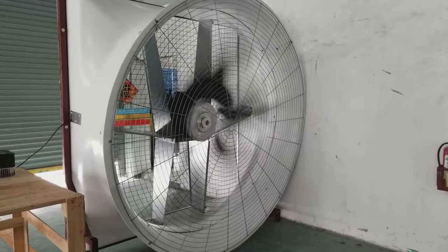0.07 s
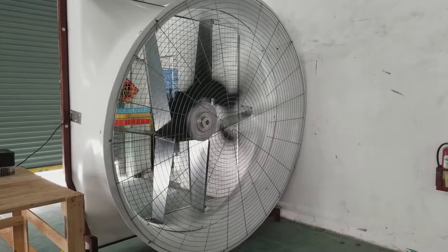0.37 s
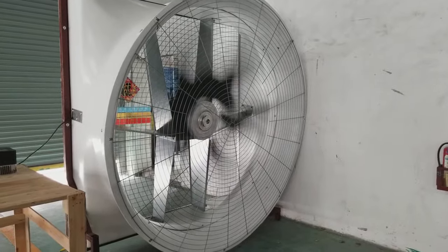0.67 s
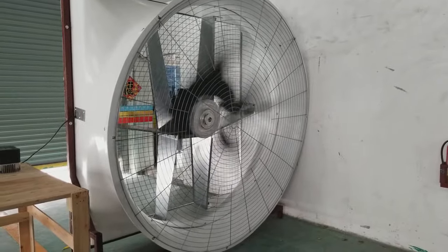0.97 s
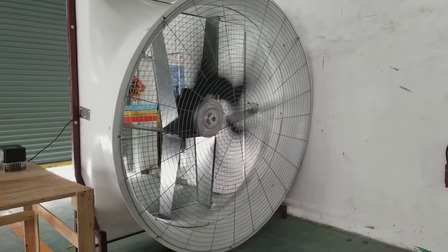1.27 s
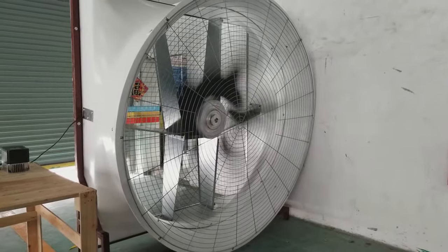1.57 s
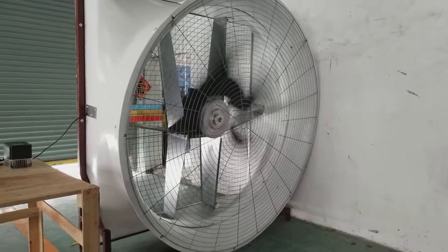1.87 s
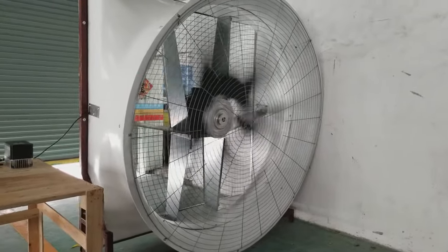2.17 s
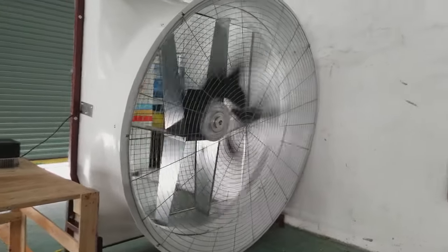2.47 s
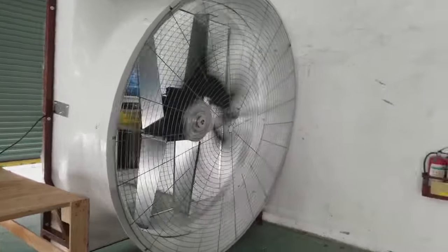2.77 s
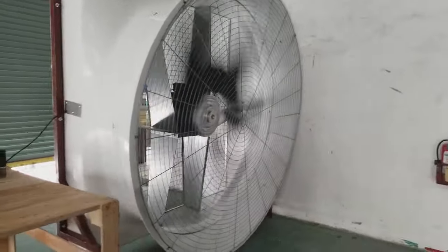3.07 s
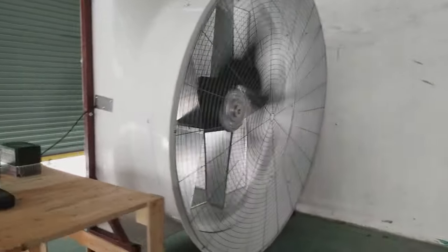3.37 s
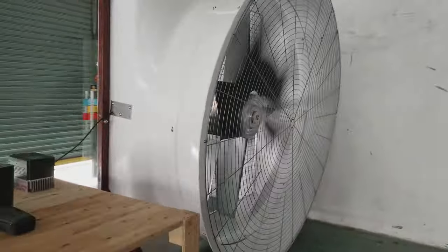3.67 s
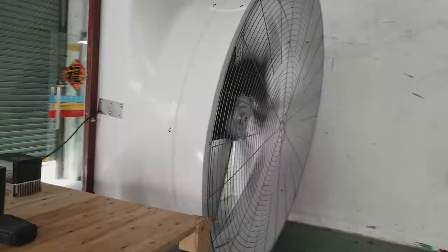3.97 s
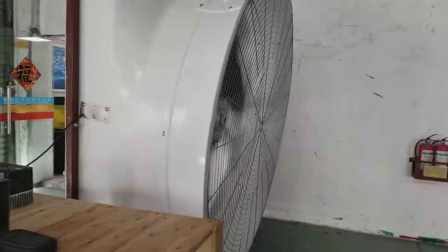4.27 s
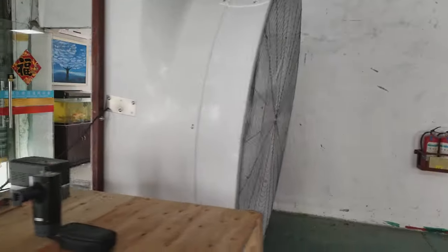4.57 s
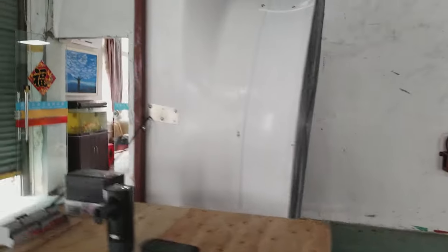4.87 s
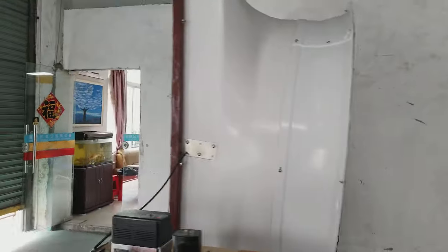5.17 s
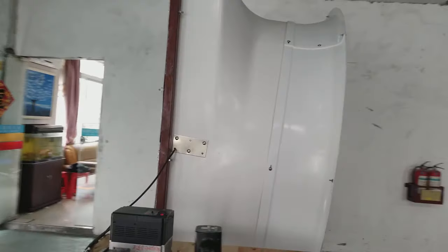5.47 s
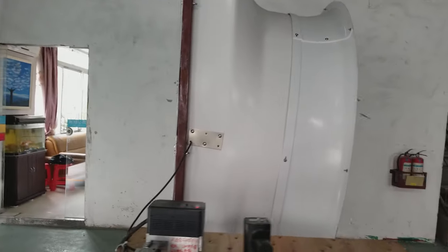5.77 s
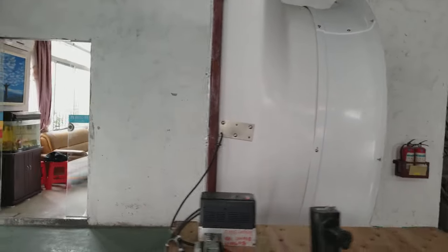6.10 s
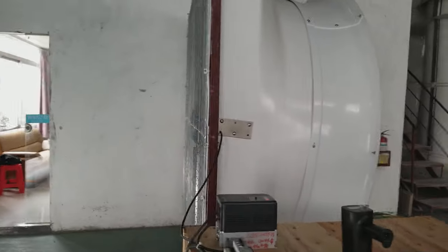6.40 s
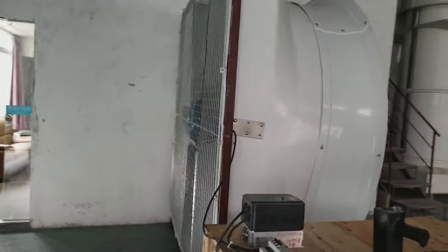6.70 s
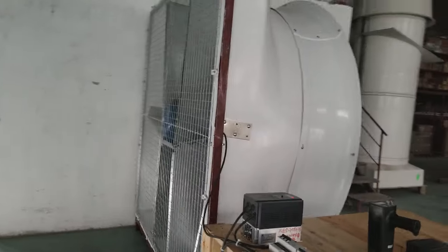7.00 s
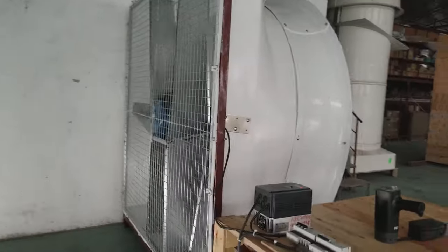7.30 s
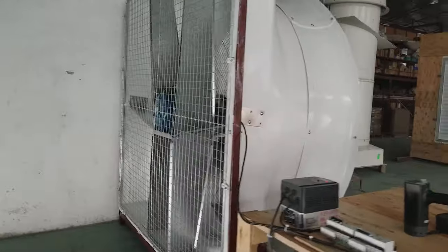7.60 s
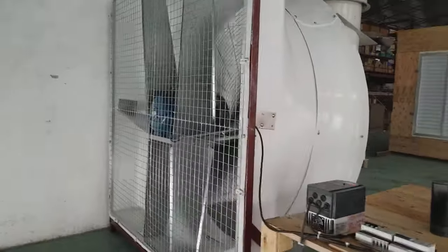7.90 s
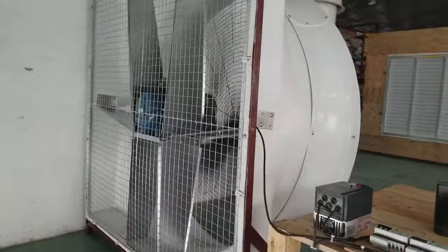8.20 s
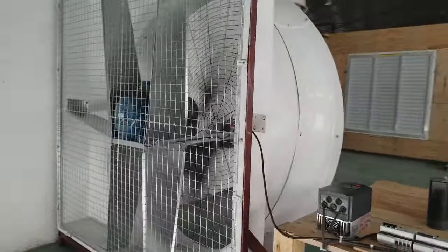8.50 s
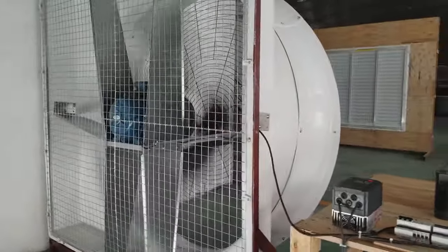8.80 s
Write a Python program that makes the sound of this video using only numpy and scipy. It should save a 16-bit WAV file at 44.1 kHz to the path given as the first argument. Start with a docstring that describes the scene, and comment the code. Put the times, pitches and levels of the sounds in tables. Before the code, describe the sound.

A large exhaust fan drones and rushes air in a hard-walled room, its steady tone swelling and fading as the microphone circles it.

```python
"""A big six-blade exhaust fan in a hard-walled workshop, heard on a phone's two microphones,
15 cm apart, carried round it from the cone past the side to the intake at the back.
The blades throb 41 times a second and chop a rush of air, the drive sings one strong note,
and the motor hums and whines faintly. The tones form standing waves in the room, so they
swell and fade as the phone moves through them. A shoe scuffs once on the way."""
import sys
import numpy as np
from scipy import signal
from scipy.fft import rfft, irfft, next_fast_len
from scipy.io import wavfile
from scipy.ndimage import uniform_filter1d, minimum_filter1d, map_coordinates

SR = 44100
rng = np.random.default_rng(int(sys.argv[2]) if len(sys.argv) > 2 else 0)


def output_pcm(signal):
    """Save a mono or channel-first signal as 16-bit PCM at the path in sys.argv[1].

    Samples are clipped to [-1, 1] before scaling.
    """
    pcm = np.clip(np.atleast_2d(signal).T, -1, 1) * 32767
    wavfile.write(sys.argv[1], SR, np.round(pcm).astype(np.int16))


N = 390285
T = np.arange(N) / SR
FFT_SIZE = 2 * next_fast_len(N // 2 + 1)
FREQS = np.fft.rfftfreq(FFT_SIZE, 1 / SR)
BLADE_HZ, BLADES = 41.33, 6
MIC_SPACING_M, SOUND_M_PER_S = 0.15, 343
SETS_OFF_S, HELD_PACE = 2.02, 0.29  # the phone moves at this share of walking pace until it sets off
EARS = np.array([[1], [-1]])  # left and right

# bearing of the fan, as the left microphone's lead: time_s, lead_ms
MIC_LEAD = [(0, -0.12), (3.5, -0.053), (4.2, -0.0071), (4.8, 0.35), (6.8, 0.48), (8.85, 0.35)]
# boom of the cone along the walk, loudest at the two openings: time_s, level_db
CONE_LEVEL = [(0, -23), (2.4, -23.5), (3.3, -27.5), (4.6, -26), (5.6, -34.5), (6.9, -36), (7.3, -35),
              (7.8, -25.5), (8.5, -24), (8.85, -23.5)]


def undb(db):
    """Decibels to gain."""
    return np.exp(np.log(10) * np.asarray(db) / 20)


def curves(table):
    """The columns of a table, joined by straight lines in time."""
    times, *columns = np.transpose(table)
    return [np.interp(T, times, column) for column in columns]


def unit(x):
    """Scale to rms 1."""
    return x / np.sqrt(np.mean(x ** 2))


def bump(at_s, half_s):
    """A bell curve in time, of height 1."""
    return np.exp(-((T - at_s) / half_s) ** 2)


def wander(rate_hz):
    """A smooth random curve with a spread near 1 that changes about rate_hz times a second."""
    knots, coarse = rng.standard_normal(1024), T[::128]
    return np.interp(T, coarse, map_coordinates(knots, [coarse * rate_hz], order=3, mode="nearest"))


def tone(turns):
    """A sine of rms 1 with a random starting phase."""
    return np.sqrt(2) * np.sin(2 * np.pi * (turns + rng.random()))


def coherence(hz):
    """Diffuse sound is alike at the two microphones only for long waves."""
    return np.sinc(2 * hz * MIC_SPACING_M / SOUND_M_PER_S)


def housing_shade_db():
    """The housing shades sound leaving the openings: 0 in front of the cone, lowest at the side."""
    cone_db, = curves(CONE_LEVEL)
    return cone_db - cone_db.max()


def turbulence(spectrum, direct):
    """Air noise: the direct share of its power reaches one microphone first, the rest is diffuse."""
    hz, db = np.transpose(spectrum)
    band_hz = FREQS[FREQS < 1.1 * hz[-1]]
    colour = undb(np.interp(np.log(band_hz + 1), np.log(hz), db))
    alike = coherence(band_hz)
    shares = np.sqrt([(1 + alike) / 2, (1 - alike) / 2, np.ones_like(alike)])
    white = rng.standard_normal(shares.shape) + 1j * rng.standard_normal(shares.shape)
    mid, side, straight = irfft(white * colour * shares, FFT_SIZE)[:, :N]
    lead_s = curves(MIC_LEAD)[0] / 1000
    straight_pair = np.array([straight, np.interp(T - lead_s, T, straight)])
    return unit(np.sqrt(direct) * straight_pair + np.sqrt(1 - direct) * (mid + side * EARS))


def room_tone(hz, clock, echo, fade_rate):
    """A tone plus wall echoes that drift as the phone moves; high tones fade apart left and right."""
    phase = 2 * np.pi * (hz * clock + rng.random())
    walked_s = np.cumsum(np.where(T < SETS_OFF_S, HELD_PACE, 1)) / SR
    fades = [np.interp(walked_s, T, wander(fade_rate)) for _ in range(4)]
    cosine, sine, alike = np.cos(phase), np.sin(phase), coherence(hz)
    mid = np.sqrt(1 + alike) * (fades[0] * cosine + fades[1] * sine)
    side = np.sqrt(1 - alike) * (fades[2] * cosine + fades[3] * sine)
    return unit(cosine + echo / 2 * (mid + side * EARS))


def air_rush(clock):
    """The cone booms; wakes roar, tips swish, struts hiss and wires sizzle, pulsing with each blade."""
    # spectra of blade wakes, blade tips, struts, guard wires and hollow cone: freq_hz, density_db
    wakes = [(20, -34.5), (35, -29.5), (62, -18), (85, -5.5), (115, -4), (170, -0.5), (235, 1), (340, 1),
             (440, -2.5), (520, -6.5), (750, -50)]
    tips = [(380, -36.5), (520, -0.5), (620, 0), (730, -1), (850, -4.5), (1000, -7.5), (1250, -9),
            (1550, -14.5), (2300, -49)]
    struts = [(1050, -20.5), (1550, -1), (1950, 1), (2600, -0.35), (3100, -4.5), (3700, -11.5),
              (4200, -14.5), (5000, -22), (6500, -35.5), (8000, -52)]
    wires = [(3500, -18), (5500, 2.5), (6800, -0.5), (8400, 0), (9000, -2), (9500, -3), (11000, -2.5),
             (12400, -1.2), (14000, -6), (15600, -7.5)]
    cone = [(120, -20.5), (175, -1), (220, -0.5), (255, 0), (300, -4.5), (380, -38.5)]
    # relative levels along the walk, weakest beside the housing: time_s, swish_db, hiss_db, sizzle_db
    rush_levels = [(0.0, -25, -30.5, -53), (3.2, -25.5, -31, -53.0), (3.95, -28, -31.0, -54.0),
                   (6.2, -29, -33.5, -54.5), (7.95, -24.5, -28.5, -49.5), (8.85, -25.5, -29, -50)]
    # how hard the blades chop the air, least from the side: time_s, relative_depth
    chop = [(0, 0.37), (1.6, 0.47), (3.2, 0.2), (6.8, 0), (8.85, 0.1)]
    swish_db, hiss_db, sizzle_db = curves(rush_levels)
    blade_phase = 2 * np.pi * BLADE_HZ * clock
    gust = curves(chop)[0] * np.cos(blade_phase)
    roar = turbulence(wakes, direct=0.22) * undb(-17.5 + 0.041 * housing_shade_db() + 0.9 * wander(6))
    swish = turbulence(tips, direct=0.21) * undb(swish_db + 5.5 + 0.16 * wander(13))
    hiss = turbulence(struts, direct=0.21) * undb(hiss_db + 3.3 + 0.29 * wander(14))
    sizzle = turbulence(wires, direct=0.02) * undb(sizzle_db + 5.5 + 0.25 * wander(20))
    boom = turbulence(cone, direct=0.26) * undb(curves(CONE_LEVEL)[0] + 2.55 * wander(8))
    # the guards are struck twice, by the front and the back edge of a blade
    edges = 1 + 0.19 * gust + 0.028 * np.cos(2 * blade_phase)
    return boom + roar * (1 + 0.15 * gust) + swish * (1 + 0.51 * gust) + (hiss + sizzle) * edges


def standing_wave(multiple):
    """Gain of one deep blade harmonic as the phone crosses its nodes and crests in the room."""
    # nodes (negative) and crests (positive): centre_s, blade_rate_multiple, half_length_s, gain_db
    crossings = [(.15, 3, .3, -12), (1.6, 4, 0.55, -3.5), (2.1, 3, .6, 3), (2.7, 2, 0.39, -13),
                 (2.9, 4, .4, 5), (3.95, 4, .22, -17), (4.0, 3, .3, -12), (4.5, 2, .5, 4),
                 (5.85, 2, 0.35, -11), (6.35, 4, .25, -7), (8.6, 4, .3, 4)]
    return undb(sum(db * bump(at_s, half_s) for at_s, k, half_s, db in crossings if k == multiple))


def blade_throb(clock):
    """The blades' pressure pulse: a deep throb and its harmonics, each wavering a little."""
    # the throb, strong in front of the cone, cancelled in the plane of the blades: time_s, level_db
    throb_level = [(0.0, -26.5), (2.4, -27.5), (5.45, -32), (6.7, -44.5), (7.1, -55), (7.8, -37.5),
                   (8.85, -35.0)]
    # deep harmonics and weaker high ones: blade_rate_multiple, relative_db
    deep_harmonics = [(2, -28.5), (3, -28), (4, -25.5)]
    overtones = [(5, -27), (6, -28), (9, -43), (12, -43), (16, -44)]
    # lift of the deep harmonics behind the fan, at the open intake: time_s, gain_db
    intake_lift = [(6.8, 0.5), (8.2, 3)]
    lead_s = curves(MIC_LEAD)[0] / 1000
    # only part of the deep sound travels across the phone; the rest stands in the room
    passes = BLADE_HZ * (clock + 0.73 * EARS * lead_s / 2)
    harmonic = lambda k: tone(k * (passes + 0.0054 * wander(7.7)))
    throb = undb(curves(throb_level)[0]) * harmonic(1)
    shade_db, intake_db = housing_shade_db(), curves(intake_lift)[0]
    for k, db in deep_harmonics:
        level_db = db + 0.08 * k * shade_db + intake_db + 0.8 * wander(2.22)  # short waves shaded more
        throb += undb(level_db) * standing_wave(k) * harmonic(k)
    upper = sum(undb(db) * room_tone(k * BLADE_HZ, clock, echo=0.56, fade_rate=2.57)
                for k, db in overtones)
    return throb + upper * undb(1.1 + 0.34 * shade_db)


def drive_note(clock, pitch_hz=578.9):
    """One strong note that flutters with each turn of the shaft and is roughened by the blades."""
    # the note along the walk: time_s, relative_db, left_minus_right_db
    note_levels = [(0.0, -18.5, -10), (1.95, -20.5, -5.5), (2.3, -22.5, 11.5), (2.65, -19, 0),
                   (2.8, -15.0, 8), (3.4, -13.0, 4.5), (3.75, -18.5, -8.0), (3.95, -16, 5), (4.3, -16, -3),
                   (4.5, -17.5, 6), (5.0, -16, -2), (5.25, -21.5, 2), (5.6, -14.5, 0), (6.85, -14.0, 2),
                   (7.05, -21.5, -0.5), (7.2, -18, 13), (7.7, -23, -9.0), (7.95, -20, -1), (8.3, -13, 4),
                   (8.85, -17, -5)]
    # relative levels of its sidebands, one blade rate either side: time_s, lower_db, upper_db
    sideband_levels = [(0.0, -33.0, -28), (2.7, -33.0, -28), (3.0, -35, -42), (3.85, -42, -29),
                       (4.95, -35, -41), (6.05, -37.0, -32), (7.65, -25.5, -37), (8.85, -34, -23.5)]
    db, pan_db = curves(note_levels)
    # near a node of the standing wave the microphones hear it out of step, and the flutter stands out
    node = np.clip((-12 - db) / 7, 0, 1.1)
    shaft_phase = 2 * np.pi * BLADE_HZ / BLADES * clock
    flutter_db = (0.21 + 0.44 * node) * np.sin(shaft_phase + EARS) + 0.13 * wander(14)
    balance = undb(EARS * pan_db / 2)
    balance /= np.sqrt(np.mean(balance ** 2, axis=0))
    note = undb(db + 0.03 - 0.4 * node + flutter_db) * balance * np.exp(0.65j * node * EARS)
    lower_db, upper_db = curves(sideband_levels)
    lower_phase = 1.3 * wander(1.824) + 0.92 * wander(0.93) * EARS - BLADES * shaft_phase
    upper_phase = 1.1 * wander(1.82) + 0.22 * wander(0.59) * EARS + BLADES * shaft_phase
    # the blades shake the note's phase more than its level, hence the opposite signs
    sidebands = undb(lower_db) * np.exp(1j * lower_phase) - undb(upper_db + 1.4) * np.exp(1j * upper_phase)
    turns = pitch_hz * clock + 0.12 * wander(1.313)  # the path length shifts as the phone moves
    return np.sqrt(2) * np.real((note + sidebands) * np.exp(2j * np.pi * turns))


def motor(clock, mains_hz=50, whine_hz=5854):
    """Magnetic hum at six times the mains rate, lesser tones and the controller's switching whine."""
    # the hum along the walk: time_s, relative_db
    hum_level = [(0, -29), (2.4, -26), (2.75, -40), (4.0, -38), (4.7, -23), (5.45, -18.5), (7.0, -25),
                 (8.85, -25.5)]
    # lesser motor tones: pitch_hz, level_db
    lesser_tones = [(329, -36.5), (879, -40), (1157.8, -47.5), (1457.8, -50.5)]
    # the whine's main line, clearest in front of the cone: time_s, level_db
    whine_level = [(0, -65), (1.6, -59), (2.1, -71), (5, -70), (8.85, -62)]
    # its other lines: pitch_hz, relative_db
    whine_lines = [(5580, -76.5), (6158.5, -62.5), (6463, -76.5)]
    hum = undb(curves(hum_level)[0] - 1.1) * tone(6 * mains_hz * T)
    lesser = sum(undb(db) * room_tone(hz, clock, echo=0.71, fade_rate=2.515) for hz, db in lesser_tones)
    whine = undb(curves(whine_level)[0]) * room_tone(whine_hz, T, echo=0.45, fade_rate=7)
    sidebands = sum(undb(db) * room_tone(hz, T, echo=2.2, fade_rate=9) for hz, db in whine_lines)
    nearer_db = np.interp(T, [SETS_OFF_S, 3.3], [-8, -0.8])  # the phone nears the speed controller
    return hum + lesser + whine + sidebands * undb(nearer_db)


def draught_buffets():
    """Now and then a draught buffets the phone for a moment."""
    # spectrum of the buffets: freq_hz, density_db
    spectrum = [(110, -19), (170, -3.5), (250, 1), (330, 1.5), (390, -19), (520, -26)]
    # brief buffets of a draught brushing the phone: centre_s, half_length_s, level_db
    buffets = [(.39, 0.034, -19), (1.06, 0.02, -13), (1.21, 0.018, -14), (2.0, 0.028, -17),
               (7.24, 0.045, -13), (7.34, 0.057, -18.5), (8.46, 0.062, -15)]
    envelope = sum(undb(db) * bump(at_s, half_s) for at_s, half_s, db in buffets)
    return envelope * turbulence(spectrum, direct=0.69)


def shoe_scuff():
    """A sole brushes the floor once, faint against the rush."""
    # the brush of the sole: centre_s, half_length_s, level_db
    brush = (5.715, .04, -49)
    at_s, half_s, db = brush
    band = signal.butter(2, [5000, 13000], "bandpass", fs=SR, output="sos")
    grit = signal.sosfilt(band, rng.standard_normal((2, N)))
    return undb(db) * unit(grit) * bump(at_s, half_s)


def scene():
    """The fan and the walk round it; the turning parts follow one shaft whose speed wanders slightly."""
    clock = np.cumsum(1 + 0.00048 * wander(1.536)) / SR
    fan = air_rush(clock) + draught_buffets() + blade_throb(clock) + drive_note(clock) + motor(clock)
    return fan + shoe_scuff()


def record(dry):
    """The phone hears a little more on the right, smoothly limits the tallest peaks and cuts the top."""
    balance_db, ceiling, window_samples, cutoff_hz = -0.1, 0.98, 256, 15700
    heard = dry * undb(EARS * balance_db / 2)
    allowed = ceiling / np.maximum(np.abs(heard).max(axis=0), ceiling)
    held = minimum_filter1d(allowed, 2 * window_samples + 1)
    gain = uniform_filter1d(uniform_filter1d(held, window_samples), window_samples)
    lowpass = 1 / (1 + (FREQS / cutoff_hz) ** 400)
    end_fades = np.sin(np.pi / 2 * np.clip(np.minimum(T, T[-1] - T) / 0.003, 0, 1)) ** 2
    return irfft(rfft(heard * gain * end_fades, FFT_SIZE) * lowpass, FFT_SIZE)[:, :N]


dry = scene()
out = record(dry)
output_pcm(out)
```